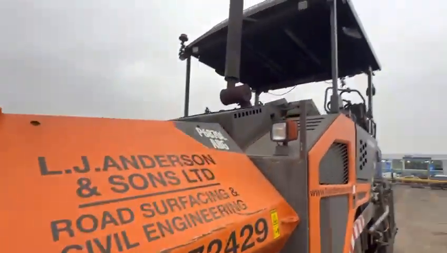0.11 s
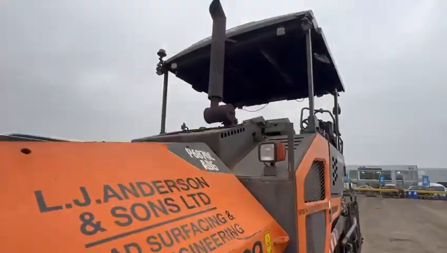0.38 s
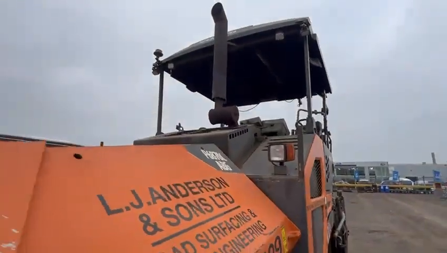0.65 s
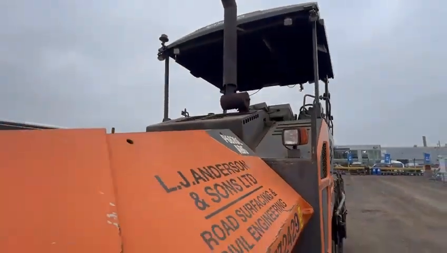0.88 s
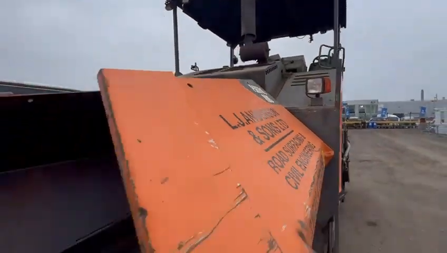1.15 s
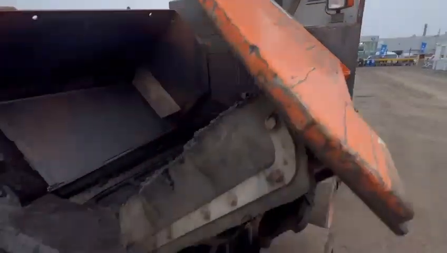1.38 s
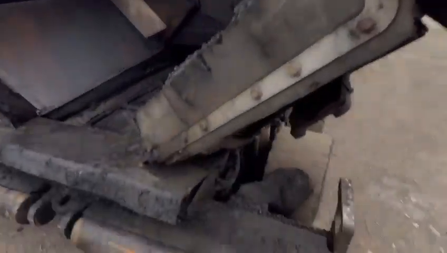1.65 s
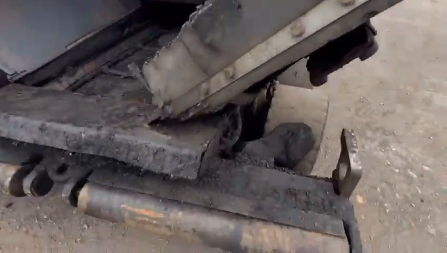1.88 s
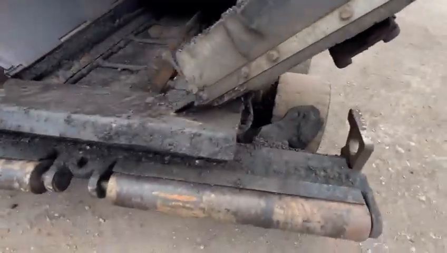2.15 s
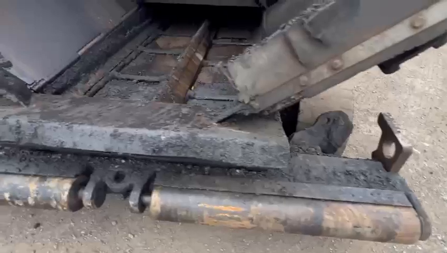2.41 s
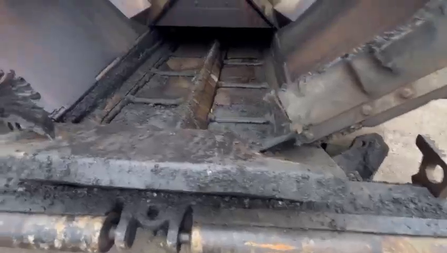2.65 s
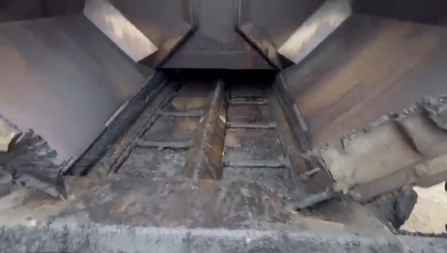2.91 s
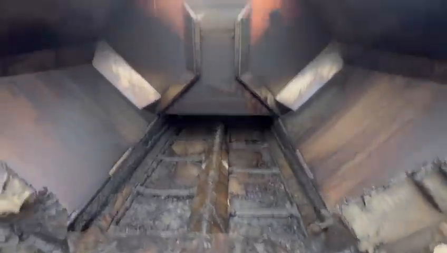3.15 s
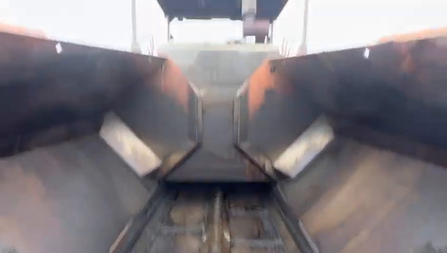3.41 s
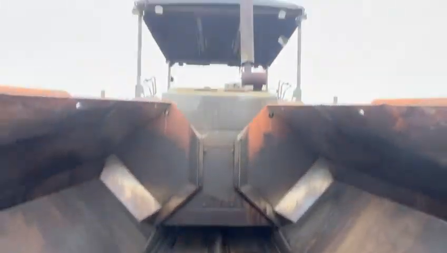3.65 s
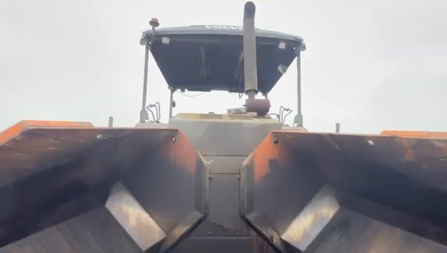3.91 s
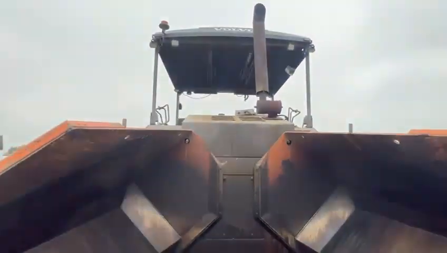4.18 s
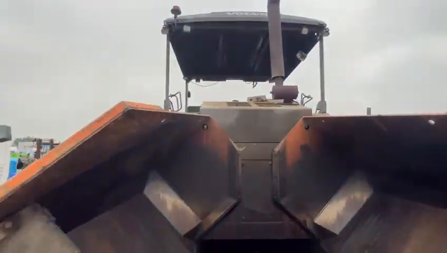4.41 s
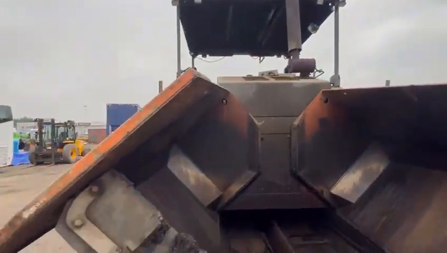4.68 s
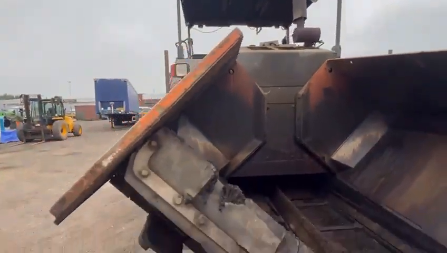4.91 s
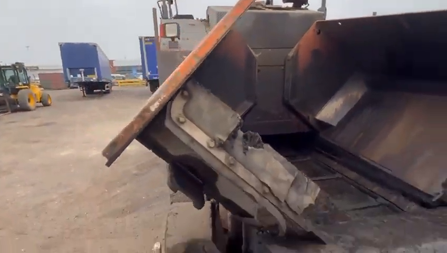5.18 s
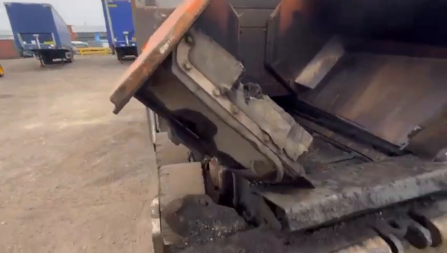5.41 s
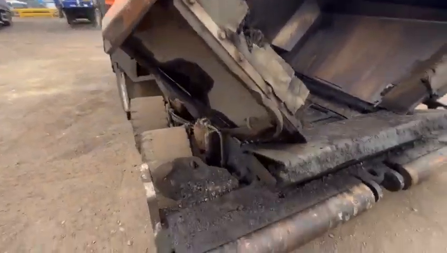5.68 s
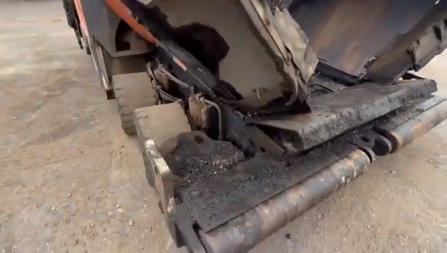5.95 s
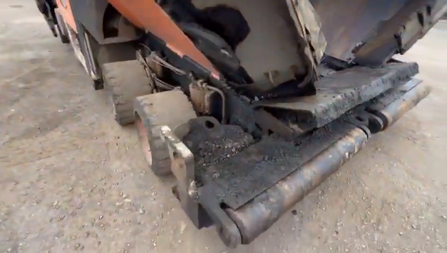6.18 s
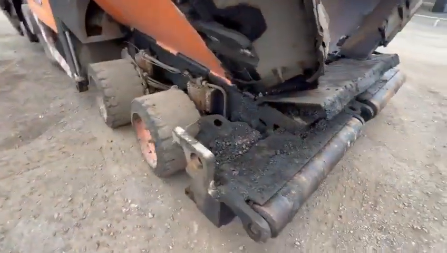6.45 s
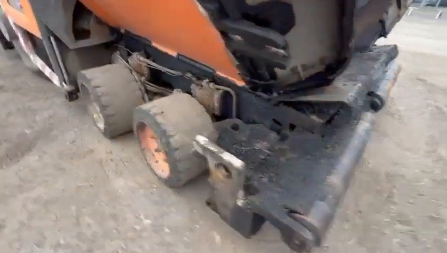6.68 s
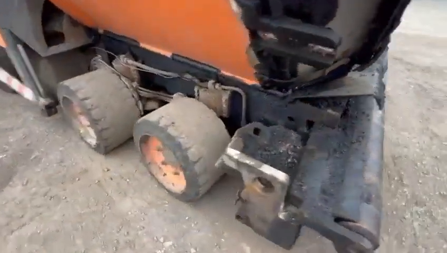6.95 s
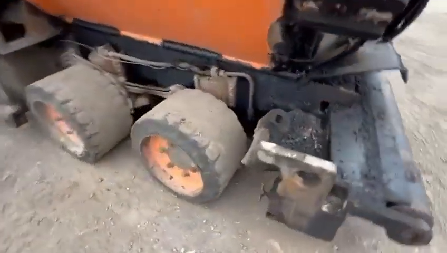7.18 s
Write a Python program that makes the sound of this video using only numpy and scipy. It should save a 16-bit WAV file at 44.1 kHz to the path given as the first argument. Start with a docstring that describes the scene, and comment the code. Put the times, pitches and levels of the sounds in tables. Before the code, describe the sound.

A heavy diesel paving machine idles at constant speed outdoors. A deep even hum dominates, over fluttering rumble and soft combustion clatter. As the listener walks round, the bass grows near the open steel hopper, thin whines and panel drones come and go, and hiss brightens near the engine side. Faint cloth rustle, small pebble ticks and brief boot crunches sit close to a handheld stereo microphone; one pebble knock near six seconds is sharper.

```python
"""A six-cylinder diesel paver idles in an open yard while someone walks a handheld camera round its steel hopper.
The exhaust hums as sines on the crank orders, which swell and fade along the walk; fan, belt and pumps sing as
wavering sines, steel panels drone as resonant noise, and shaped noise jumping at each firing roars and clatters.
Clothing swishes as high noise close to the two spaced microphone ports, kicked pebbles tick as short rings and
boots crunch as clumps of noise grains."""
import sys
import numpy as np
from scipy import signal
from scipy.fft import rfft, irfft, next_fast_len
from scipy.io import wavfile
from scipy.ndimage import uniform_filter1d, map_coordinates

SR = 44100
rng = np.random.default_rng(int(sys.argv[2]) if len(sys.argv) > 2 else 0)


def dump_mix(stems):
    """Bounce the given channels to the path in sys.argv[1] as a 16-bit WAV at rate SR."""
    frames = np.atleast_2d(stems).T  # one column per channel
    limited = np.clip(frames, -1, 1)  # hard clip at full scale
    pcm = np.round(limited * 32767).astype(np.int16)
    wavfile.write(sys.argv[1], SR, pcm)


def undo_db(level):
    """Turn decibels back into plain size, where 20 dB means ten times bigger."""
    steps = np.asarray(level, float) / 20
    return 10 ** steps


N = 322812
CRANK_HZ = 13.846  # turns of the crankshaft per second
CONTROL_STEP = 64  # samples between control points

# The walk round the machine. Each row: time in seconds, bass lift before the hopper mouth in dB,
# engine bay in earshot in dB, far-side louvres in earshot in dB.
WALK = [(0, -36, 4.5, -2.5), (.1, -10.5, 5.5, -3.5), (.3, -19, 6, -2), (.55, -9.5, 4.5, -1),
        (.9, -6, -0.5, 1.5), (1.3, -4, -2.5, 2.5), (1.65, -1.5, -2.5, 2.5), (2.0, -1, -1, 1.5),
        (2.8, 1, -2, 2), (3.5, 0, -1.5, 2), (4.1, 0, -2, 1), (4.7, 0, -4, 3), (5.2, -1.5, -10.5, 8),
        (5.6, -3, -1, 1), (5.9, -2.5, -4.5, 4), (6.2, -2.5, 0, 1.5), (6.8, -3.5, 2, 1.5),
        (7.1, -5.5, 0, 4.5), (7.32, -9, 7, -1.5)]


def clock():
    """Times of the control points in seconds."""
    return np.arange(0, N + CONTROL_STEP, CONTROL_STEP) / SR


def smooth(control):
    """A control curve drawn out to every sample."""
    return np.interp(np.arange(N) / SR, clock(), control)


def curves(rows):
    """One control curve for each column after the time."""
    seconds, *columns = np.transpose(rows)
    return [np.interp(clock(), seconds, column) for column in columns]


def wobble(rate):
    """A smooth random control curve through rate knots a second."""
    knots = rng.standard_normal(int(N * rate / SR) + 4)
    return map_coordinates(knots, [clock() * rate])


def spots(rows):
    """Bell-shaped bumps along the walk, from rows of centre in s, width in s and height."""
    return sum(height * np.exp(-((clock() - s) / width) ** 2) for s, width, height in rows)


def unit(x):
    """Scaled to rms 1."""
    return x / np.sqrt(np.mean(x ** 2) + 1e-20)


def along(points, hz):
    """Reads (Hz, value) points on a log frequency axis."""
    f, value = np.transpose(points)
    return np.interp(np.log(hz + 1), np.log(f + 1), value)


def filtered(x, response):
    """Filters x by a complex response of frequency."""
    size = next_fast_len(N + 8192)
    spectrum = rfft(x, size) * response(np.fft.rfftfreq(size, 1 / SR))
    return irfft(spectrum, size)[..., :N]


def tone(turns, db, flutter):
    """A sine of db rms at the given running turns, its phase wandering by about flutter radians/2 pi turns."""
    phase = 2 * np.pi * turns + smooth(flutter * wobble(3.004))
    return -np.sqrt(2) * smooth(undo_db(db)) * np.cos(phase)


def rush(spectrum, patchy_db, gate=1):
    """Turbulence as three gated noises (one direct, two scattered), jointly of rms 1, in patches of random gain."""
    z = signal.stft(rng.standard_normal((3, N)), nperseg=512)[2]
    patches = rng.standard_normal(z.shape[1:])
    patches = uniform_filter1d(patches, 5, 0)  # over frequency
    patches = uniform_filter1d(patches, 10, 1)  # over time
    noise = signal.istft(z * undo_db(patchy_db * unit(patches)), nperseg=512)[1][:, :N]
    return unit(filtered(noise * gate, lambda hz: undo_db(along(spectrum, hz))))


def exhaust():
    """Suction pulses of the stack as crank orders; the hopper lifts the bass, reflections cancel the top strong one."""
    # Each row: multiple of the crank rate, mean level at the hopper mouth in dB rms,
    # share of the bass lift, depth of random fading in dB.
    strong = [(3, -29, 0.83, -1.5), (6, -16.5, 1, 0.67), (9, -39.5, -0.32, 2.5), (12, -26.5, 0.27, 1)]
    # Each row: multiple of the crank rate, mean level in dB rms.
    weak = [(4, -43), (5, -40.5), (10, -36), (11, -42.5), (15, -38), (18, -43), (20, -50.5), (21, -45),
            (24, -50), (27, -44), (30, -54), (39, -61), (42, -58), (44, -50), (48, -51), (49, -55.5)]
    # Where a reflection cancels the top strong order. Each row: time in seconds, width in seconds, depth in dB.
    dead_spots = [(.75, 0.29, 22), (2.25, 0.14, 3), (3.45, 0.32, 13), (3.9, 0.27, 12), (5.3, 0.12, 15),
                  (6.22, 0.26, 14)]
    crank = CRANK_HZ * np.arange(N) / SR
    lift_db = curves(WALK)[0]
    levels = [db + share * lift_db + fade_db * wobble(4) for order, db, share, fade_db in strong]
    levels[-1] = levels[-1] - spots(dead_spots)
    hum = sum(tone(round(row[0]) * crank, db, flutter=0.0088 * row[0]) for row, db in zip(strong, levels))
    faint = sum(tone(int(order) * crank + rng.random(), db + 3 * wobble(1.202), flutter=0.46)
                for order, db in weak)
    return hum + faint


def accessories():
    """Fan, belt, gears and hydraulic pumps sing off the crank orders; among the faint tones high ones waver more."""
    # Faint fan and pump tones. Each row: frequency in Hz, mean level in dB rms.
    faint_tones = [(60.6, -46), (99.9, -43), (170, -42), (213, -46), (295, -49), (344, -45.5), (420, -52.5),
                   (496, -51), (686, -51.5), (1474, -57), (1559, -62), (2333, -67), (4689, -70.5)]
    # Gear tones along part of the walk. Each row: time in seconds, width in seconds, frequency in Hz,
    # mean level at the height of the swell in dB rms.
    gear_tones = [(3.6, 1, 1189, -45), (1.6, .6, 1000, -52.5), (3.6, 0.69, 1100, -57.5),
                  (3.6, .5, 560, -40.5), (4.2, .5, 420, -39), (3.3, .7, 1828, -48.5),
                  (1.4, 0.57, 1828, -53), (2.9, 0.9, 1021, -52.5), (5.55, 0.26, 1021, -52),
                  (0.9, 1, 3044, -59.5), (3.7, 0.61, 1300, -53.5)]
    # Loud spots of belt hum and hydraulic whine. Each row: time in seconds, width in seconds, lift in dB.
    hum_spots = [(2.4, 0.14, 8.3), (2.85, 0.11, 8.9), (3.7, 0.11, 9.5), (4.9, 0.94, 5.5), (6.7, 1, 11.7)]
    whine_spots = [(1.38, 0.21, 18), (2.05, 0.1, 18), (2.75, 0.11, 18), (3.3, 0.43, 17.3), (4.25, 0.68, 10),
                   (5.05, 0.14, 8.6), (6.22, 0.092, 11)]
    t = np.arange(N) / SR
    faint = sum(tone(hz * t + rng.random(), db + 2.5 * wobble(2.21), flutter=0.53 + hz / 900)
                for hz, db in faint_tones)
    gears = sum(smooth(spots([(s, width, 1)])) * tone(hz * t, db + 3 * wobble(5.8), flutter=1.2)
                for s, width, hz, db in gear_tones)
    # the levels in dB rms hold away from the loud spots
    hum = tone(147.6 * t, -38 + spots(hum_spots) + 1 * wobble(3.0), flutter=0.24)
    whine = tone(1285 * t, -63.5 + spots(whine_spots) + 1.7 * wobble(3.0), flutter=1.0)
    return faint + gears + hum + whine


def panels():
    """Steel panels drone as the walk passes their loud side: noise through one narrow resonance each."""
    # Each row: time in seconds, width in seconds, resonance in Hz, level at the height of the swell in dB rms.
    steel = [(.06, 0.11, 127, -25.5), (.3, 0.54, 242.5, -34.5), (1.0, 0.18, 523, -33),
             (1.601, 0.48, 182.5, -39), (2.4, 0.52, 758, -39), (3.5, 0.77, 514, -35.5),
             (4.7, 0.31, 241, -33), (5.6, .5, 287.4, -34.5), (5.7, 0.39, 1540, -44.5),
             (7.1, 0.67, 226.2, -33), (7.2, 0.32, 1050, -48)]
    out = np.zeros(N)
    for s, width, hz, db in steel:
        b, a = signal.iirpeak(hz, 32, SR)  # Q of 32
        drone = unit(signal.lfilter(b, a, rng.standard_normal(N)))
        out += smooth(undo_db(db) * spots([(s, width, 1)])) * drone
    return out


def knocks(decay_s, depth, scatter_db):
    """A gate that jumps at each firing, sized by cylinder and by chance, and dies away."""
    # Relative knock strength of each cylinder in turn, in dB.
    cylinders = [-13, -14, -16.5, -17, -10.5, -20]
    firing_hz = 3 * CRANK_HZ  # six cylinders fire in two turns
    firing = firing_hz * np.arange(N) / SR
    index = firing.astype(int)
    chance_db = scatter_db * rng.standard_normal(index[-1] + 1)
    size = undo_db(np.array(cylinders)[index % len(cylinders)] + chance_db[index])
    since_s = (firing - index) / firing_hz
    return 1 + depth * size * np.exp(-since_s / decay_s)


def machine():
    """Turbulent rumble and roar below, combustion knock and valve clatter above, as bay and louvres lie open."""
    # The colour of each noise layer, low to high. Each row: frequency in Hz, relative level in dB per Hz.
    rumble_colour = [(15, -15), (30, -5), (60, 1.5), (130, 1), (220, -0.5), (300, -6.5), (360, -14.5),
                     (450, -120)]
    roar_colour = [(180, -25.5), (300, -3.5), (422, -0.5), (456, -3.5), (504, -2), (550, -5.5), (745, -5.5),
                   (900, -13.5), (1170, -36), (1980, -120)]
    drone_colour = [(490, -26.5), (830, 0), (967, 0.5), (1050, 7.5), (1130, -0.5), (1520, 3), (1750, -23),
                    (2280, -48), (3850, -120)]
    block_colour = [(970, -30), (1600, 8.5), (1750, 4), (1900, 5.5), (2390, 3), (2700, -0.5), (3660, -1.5),
                    (4200, -24.5), (5460, -46), (9240, -120)]
    valve_colour = [(2290, -17), (3900, 2.5), (4300, -2.5), (4870, 2.5), (5360, -4.5), (5710, -1),
                    (7030, -6.5), (7610, -16.5), (7700, -22), (10000, -42.5), (16900, -120)]
    bay_db, louvre_db = curves(WALK)[1:]

    def level(db, bay, louvre, swell_db):
        """Gain from a base level, shares of the two walk controls and a random swell."""
        return smooth(undo_db(db + bay * bay_db + louvre * louvre_db + swell_db * wobble(9)))

    rumble = level(-27, bay=0.5, louvre=0.5, swell_db=0.8) * rush(
        rumble_colour, patchy_db=1.0, gate=knocks(decay_s=0.018, depth=0.54, scatter_db=3))
    roar = level(-31.5, bay=0.19, louvre=0.12, swell_db=0) * rush(
        roar_colour, patchy_db=1.22, gate=knocks(decay_s=0.015, depth=1.6, scatter_db=5.0))
    drone = level(-35.5, bay=-0.41, louvre=-1.2, swell_db=0.5) * rush(
        drone_colour, patchy_db=1.36, gate=knocks(decay_s=0.015, depth=1.4, scatter_db=1.5))
    clatter = level(-42, bay=0.15, louvre=-0.41, swell_db=0.26) * rush(
        block_colour, patchy_db=1.1, gate=knocks(decay_s=0.015, depth=1.4, scatter_db=3.5))
    hiss = level(-51, bay=1.16, louvre=1.3, swell_db=1.06) * rush(
        valve_colour, patchy_db=1.0, gate=knocks(decay_s=0.012, depth=0.95, scatter_db=7.0))
    return rumble + roar + drone + clatter + hiss


def clothing():
    """Cloth rustles near the ports as high noise and swishes with some strides."""
    # Each row: frequency in Hz, relative level in dB per Hz.
    cloth_colour = [(4530, -28.5), (7700, -15), (7940, 4), (8270, 3.5), (9370, -0.5), (10000, -22),
                    (13000, -35), (22000, -120)]
    # Each row: time in seconds, width in seconds, lift over the steady rustle in dB.
    swishes = [(.1, .12, 4.3), (1.25, 0.16, 7), (3.7, 0.29, 3.8), (5.48, 0.09, 8.7), (6.9, 0.053, 2.9),
               (7.23, 0.074, 5.2)]
    texture = smooth(undo_db(1.4 * wobble(300)))
    return smooth(undo_db(-62.5 + spots(swishes))) * rush(cloth_colour, patchy_db=0.5, gate=texture)


def ticks():
    """Kicked pebbles: a short ring of decaying sines, shaded at the far port, once more off the ground."""
    # Each row: start in seconds, level in dB, left over right in dB.
    kicks = [(0.2414, -47, 7.5), (0.3857, -41, 5), (0.5282, -47, 7.5), (3.2824, -41, 6.5),
             (4.2646, -41, -1), (6.059, -42, 9.5), (6.1672, -20, 0)]
    # Modes of a pebble. Each row: frequency in Hz, relative level in dB, time to fall 60 dB in seconds,
    # left over right in dB.
    pebble = [(1400, -9, .012, 0), (2900, 0, .007, 5), (3400, 0, .007, -1), (4000, -1, .006, 4),
              (4700, -2, .006, 11), (5600, -5, .005, 11), (6500, -14, .004, 2)]
    right_lag_s, ground_s, ground_db = .0003, .005, -8
    out = np.zeros((2, N + SR))
    t = np.arange(SR // 50) / SR
    side = np.array([[.5], [-.5]])  # half of each left-right difference to either port
    for s, db, pan_db in kicks:
        ring = 0
        for hz, mode_db, t60, shade_db in pebble:
            decay_db = mode_db + side * shade_db + rng.normal(0, 1.0) - 60 * t / t60
            ring = ring + undo_db(decay_db) * np.sin(2 * np.pi * hz * t)
        ring = ring * (1 - np.exp(-t / .0002))  # soft onset
        ring = np.array([ring[0], np.roll(ring[1], round(right_lag_s * SR))])
        ground = undo_db(ground_db) * np.roll(ring, round(ground_s * SR), axis=1)
        out[:, round(s * SR):][:, :len(t)] += undo_db(db + side * pan_db) * (ring + ground)
    return out[:, :N]


def boots():
    """Each crunch is a short clump of grit grains, noise of jumping loudness in a broad band."""
    # Each row: start in seconds, length in seconds, level before the swell in dB rms,
    # nominal centre in Hz, left over right in dB.
    crunches = [(0.487, .012, -58.5, 8850, 7.5), (1.834, 0.037, -47, 6060, 10.5),
                (1.96, 0.024, -61.5, 9300, -11), (2.458, 0.057, -64.5, 8830, -5),
                (3.063, 0.04, -52.5, 8550, 7), (4.823, .007, -49, 6980, 15.5),
                (4.835, 0.023, -46, 8000, 14), (4.908, 0.014, -54.5, 8130, 8),
                (4.974, 0.0069, -54, 8020, 8), (6.021, 0.046, -49.5, 8950, 7)]
    out = np.zeros((2, N + SR))
    for s, length, db, hz, pan_db in crunches:
        t = np.arange(int(length * SR) + 1) / SR
        grain_db = 1.7 * rng.exponential(size=len(t) // 60 + 1)
        grain_db = grain_db.repeat(60)[:len(t)]  # each grain lasts 60 samples
        grains = rng.standard_normal((2, len(t))) * undo_db(grain_db)
        band = signal.butter(2, [0.6 * hz, 1.34 * hz], "band", fs=SR, output="sos")
        crunch = unit(signal.sosfilt(band, grains)) * np.sin(np.pi * t / length) ** 0.37
        port_db = db + np.array([[pan_db], [-pan_db]]) / 2
        out[:, round(s * SR):][:, :len(t)] += undo_db(port_db) * crunch
    return out[:, :N]


def ports(direct, left, right):
    """Two spaced ports: direct sound shifts between them as the camera turns, scattered sound differs at each."""
    # Each row: frequency in Hz, share of the power that comes from one direction (0-1).
    direct_share = [(60, 1), (130, 1), (260, 0.89), (450, 0.58), (800, 0.63), (1300, 0.3), (2300, 0.25),
                    (3500, 0.02), (9000, 0.1)]
    # Each row: frequency in Hz, left over right in dB.
    port_tilt = [(60, 0), (110, -0.7), (190, 1), (330, -2), (570, 2), (1000, 0.5), (1770, -.5), (3100, -1),
                 (5450, 10.5), (9580, 3)]
    # The low exhaust lies nearer the middle. Each row: frequency in Hz, lead of the left port in ms.
    left_lead = [(100, 0.09), (600, 0.18), (1500, 0.382)]
    # The camera turns. Each row: time in seconds, extra lead of the left port in ms.
    camera_turn = [(0, -0.063), (.6, 0.023), (1.4, -0.041), (1.8, 0.018), (2.6, 0.0071), (3, 0.021),
                   (3.9, 0.015), (4.25, -0.017), (4.55, -0.18), (5, -0.28), (5.45, -0.26), (5.75, 0.063),
                   (6.2, -0.0092), (6.7, -0.049), (7.32, 0.0099)]
    shift = smooth(curves(camera_turn)[0]) * SR / 2000  # half the lead, in samples

    def port(scattered, side):
        """One port; side is 1 for left and -1 for right."""
        def response(hz):
            share = np.clip(along(direct_share, hz), 0, 1)
            tilt = undo_db(side * along(port_tilt, hz) / 2)
            lead = np.exp(1j * side * np.pi * hz * along(left_lead, hz) / 1000)
            return tilt * np.array([np.sqrt(share) * lead, np.sqrt(1 - share)])
        turned = map_coordinates(direct, [np.arange(N) + side * shift], mode="nearest")
        return filtered(np.array([turned, scattered]), response).sum(0)

    return np.array([port(left, 1), port(right, -1)])


def scene():
    """Tones arrive direct, with a late copy off the hopper walls; the noise is partly scattered."""
    tones = exhaust() + accessories() + panels()
    direct, left, right = machine() + clothing()
    left_copy, right_copy = np.roll(tones, 130), np.roll(tones, 170)  # samples late
    around = ports(direct + tones, left + left_copy, right + right_copy)
    return around + ticks() + boots()


def top_cut(x):
    """Nothing passes above the cut-off."""
    return signal.sosfilt(signal.butter(12, 10180, fs=SR, output="sos"), x)


def record(dry):
    """The finished mix as the camera stores it."""
    return top_cut(dry)


dry = scene()
out = record(dry)
dump_mix(out)
```